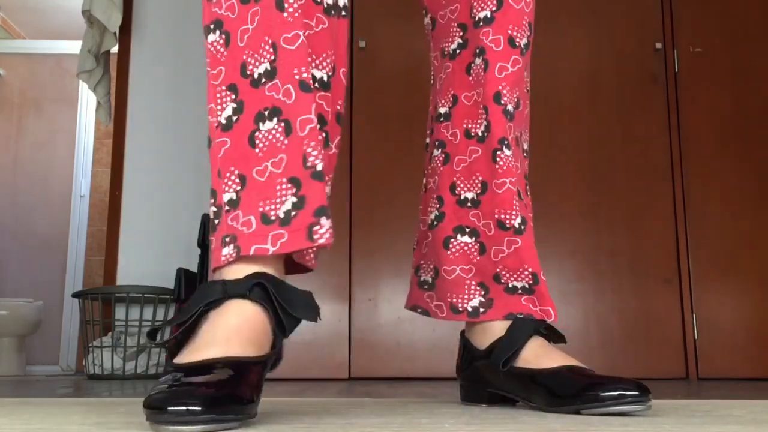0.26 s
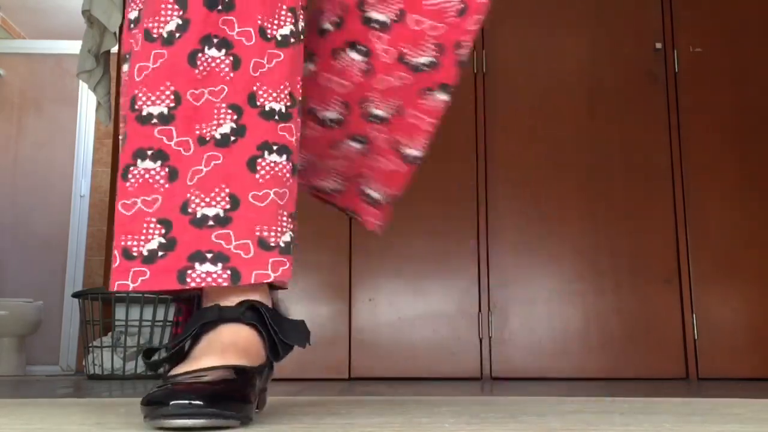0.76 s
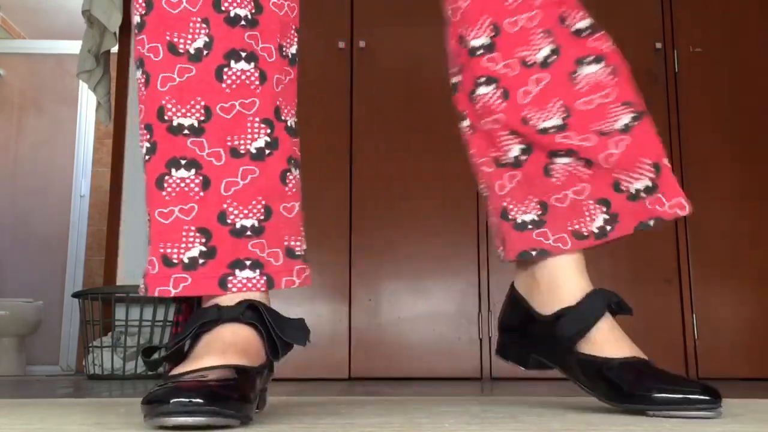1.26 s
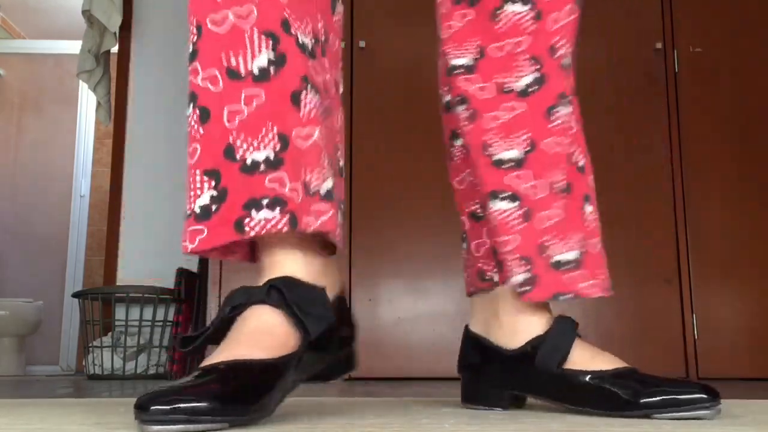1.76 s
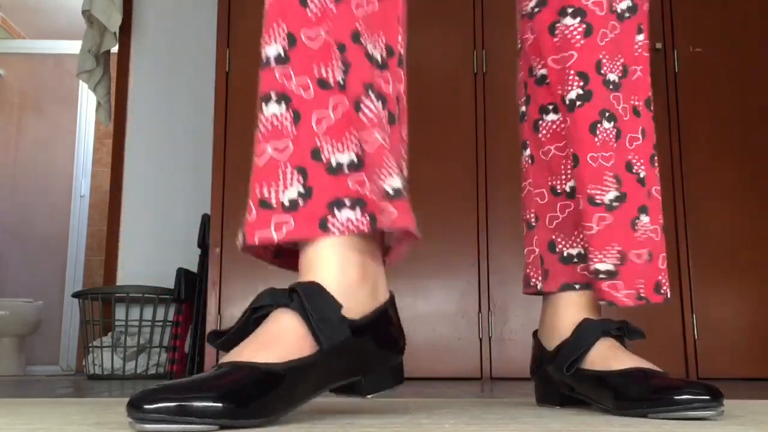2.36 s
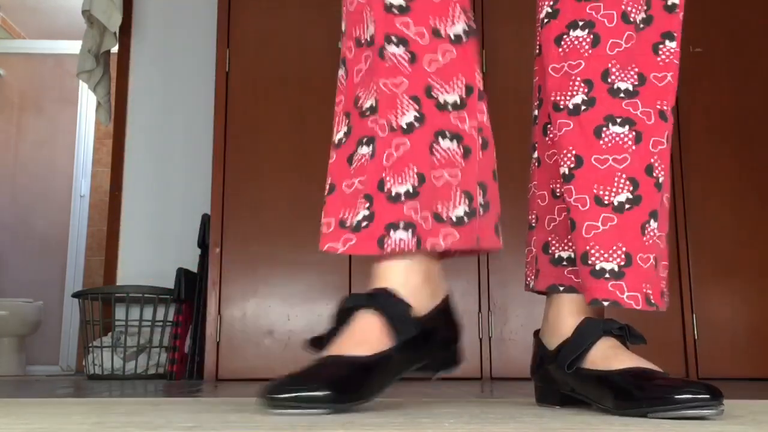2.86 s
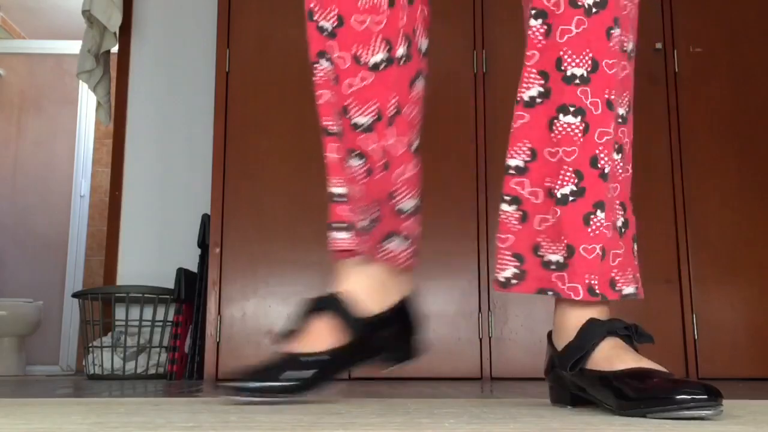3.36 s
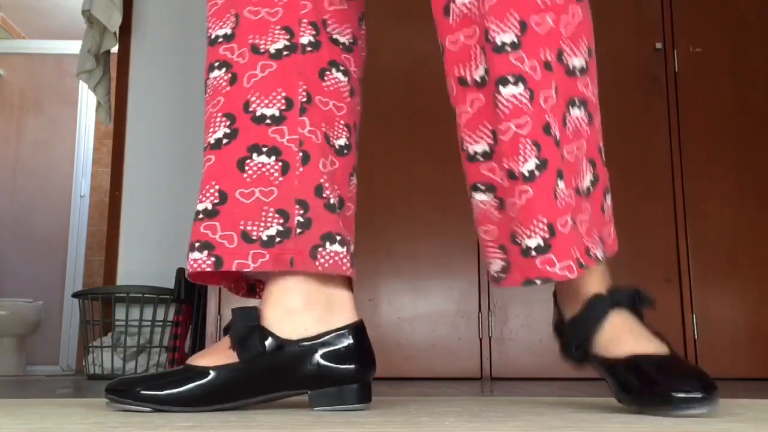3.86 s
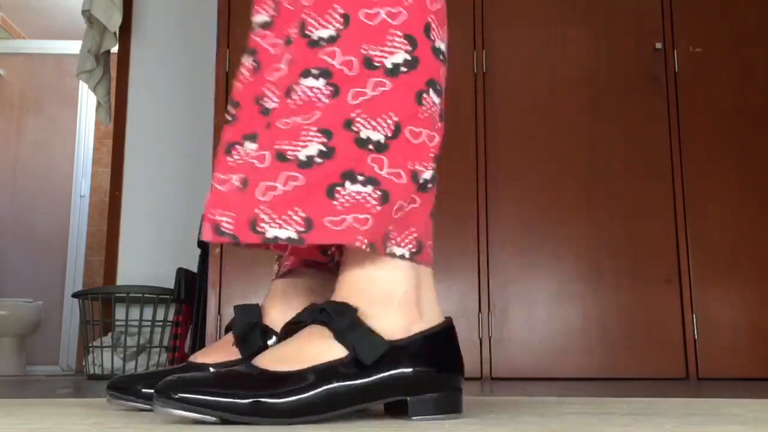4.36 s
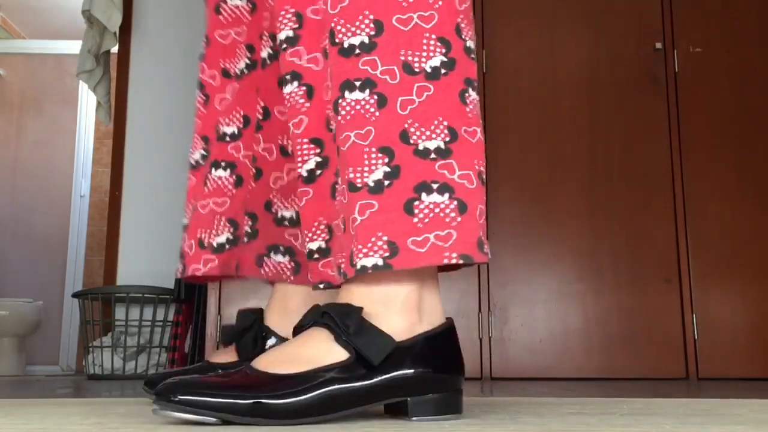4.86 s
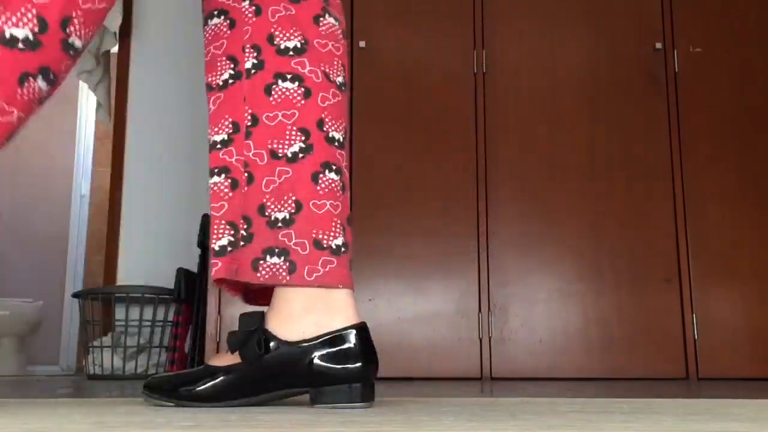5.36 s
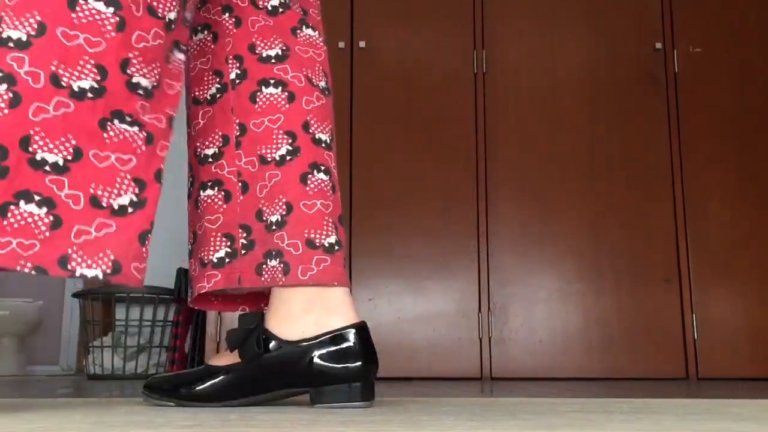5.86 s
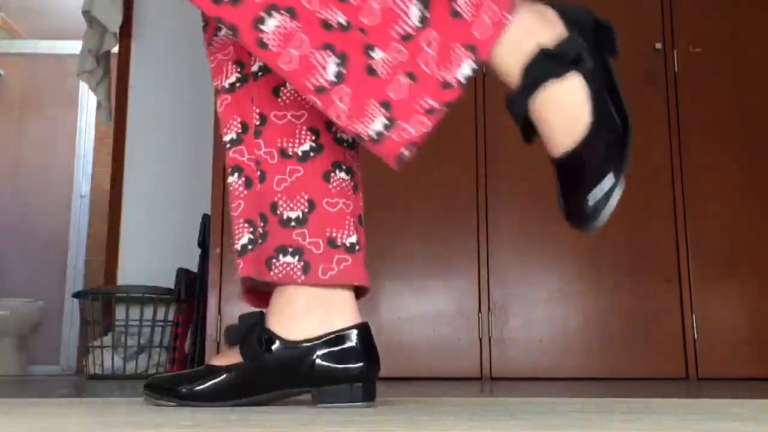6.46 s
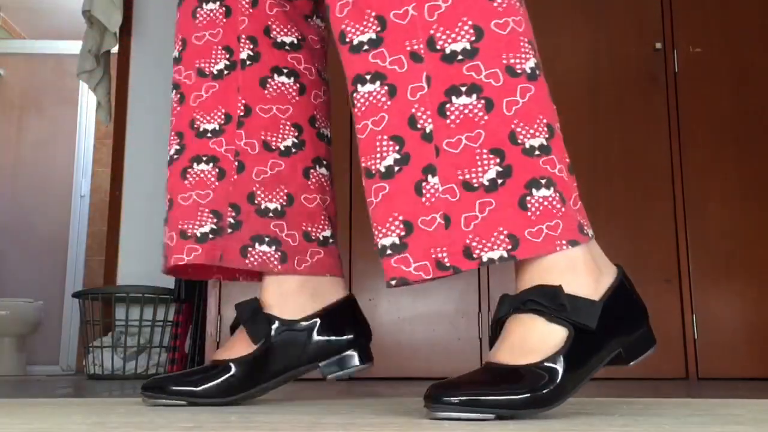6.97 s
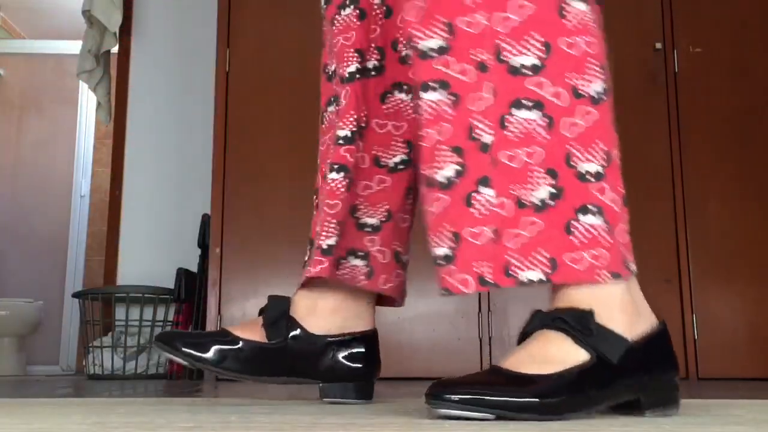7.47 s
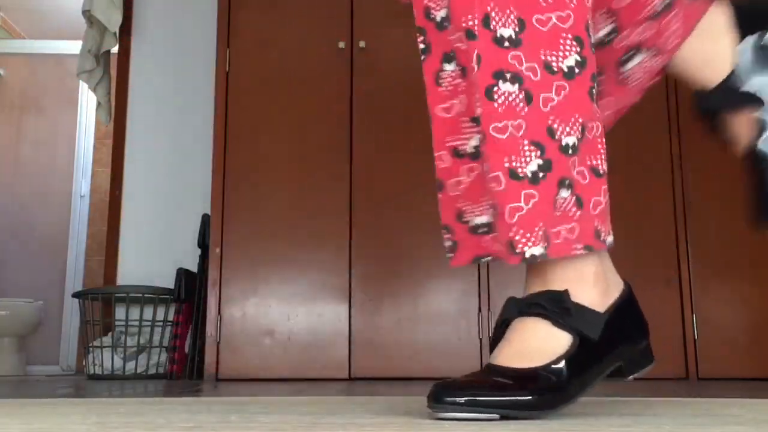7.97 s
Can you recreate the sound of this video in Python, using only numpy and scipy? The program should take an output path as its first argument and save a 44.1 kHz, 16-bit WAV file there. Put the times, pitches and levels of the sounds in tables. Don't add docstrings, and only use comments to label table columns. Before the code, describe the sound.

Close, crisp tap-dance steps clack and thud on a hard floor, each blow answered by a dense short echo in an empty-sounding room.

```python
import sys
import numpy as np
from scipy import signal
from scipy.fft import rfft, irfft, next_fast_len
from scipy.io import wavfile
from scipy.ndimage import uniform_filter1d

SR = 44100
rng = np.random.default_rng(int(sys.argv[2]) if len(sys.argv) > 2 else 0)


def field_ratio(decibels):
    return 10 ** (np.asarray(decibels, dtype=float) / 20)


def unload_wav(signal):
    wavfile.write(
        sys.argv[1],
        SR,
        np.round(np.clip(np.atleast_2d(signal).T, -1, 1) * 32767).astype(np.int16),
    )


N = 362502
LEAD = SR // 4

# start_s, peak_db, knock_hz, clack_db, click_db
BLOWS = [(0.116, -7, 1017, -9.5, -16), (0.5699, -6.5, 1136, -14.5, -32), (1.142, -18, 767, -15, -15.5),
         (1.3802, -16.5, 833, -3, -5), (1.8548, -13.5, 933, -15.5, -40), (2.0513, -14.5, 1170, -7.5, -24),
         (2.3998, -5.5, 1065, -12.5, -23), (2.5896, -13.5, 806, -14, -31.5),
         (2.9872, -17.5, 1010, -1, -18.5), (3.2879, -10.5, 1350, -11, -19), (3.7127, -15.5, 1310, -5, -12),
         (3.889, -17, 916, -14, -27), (4.4674, -5.5, 946, -22, -41), (4.992, -17.5, 928, -4.5, -9),
         (5.2218, -28.5, 720, -20, -60), (5.5989, -7, 1494, -14, -32.5), (6.1064, -4.5, 843, -3.5, -13),
         (6.4852, -10.5, 1050, -11, -17.5), (6.786, -6, 800, -7.5, -23.5), (7.2375, -8.5, 1426, -5, -23.5),
         (7.6328, -11, 904, -9, -25), (7.8095, -8, 840, -8, -10.5)]
# force_db, body_weight_db, sole_hollow_db, steel_share_db, plate_ring_db
STANCES = [(-3, -7, 0.5, 3.5, 4), (-5, 5, -3.5, -4, 3), (-8, -3, -3, 0, 7), (-6, 0, 2, 6.5, 2),
           (-9.5, -1.5, -2, -15.5, -1), (-13, -2.5, -1, -2, 2.5), (-4, 5, 4, -0.5, 2.5),
           (-13, 1, -4.5, -2, -4), (-13, -1, 4.5, 5, 1.5), (-7, 4, -0.5, -3, -12), (-8, 1.5, 2, 6.5, -5.5),
           (-19, -2.5, -3, -0.5, 1), (-4, 1, 8, -0.5, 6), (-5.5, -1, 1, 7.5, 4), (-24.5, -7, 1.5, -5, -6),
           (-5.5, 3, -7.5, -8, 5), (-0.5, -0.5, -6, 3.5, 2), (-9.5, 3.5, 1, 3.5, -1), (-2.5, 1.5, 9, 7, -2),
           (-7, 3.5, -2, 0, 0.5), (-5, 1.5, -8, -10.5, 2), (-2.5, -9, 1.5, 5, 8)]
# start_s, peak_db, thud_db, clack_db, click_db
LATE_LANDINGS = [(1.867, -31, -20, -25, -32), (3.291, -11, -30, -11, -28.5),
                 (3.7268, -36.5, -25, 14, -11.5), (4.4755, -24.5, -14.5, 4.5, -8),
                 (4.4805, -22.5, -1.5, -5.5, -3), (5.0063, -20, -2.5, -3, -27),
                 (5.617, -32, -20.5, 1.5, -7.5), (6.4839, -23, -4.5, -1, -6),
                 (6.7895, -18.5, -21, 3.5, -9.5), (6.8018, -11.5, -32, -8.5, -22.5),
                 (7.244, -23, -27, -2, -22), (7.638, -38, -17, -3.5, -6), (7.8176, -16.5, -29, -24, -10)]
# echo_db, peak_db, knock_hz, thud_db, clack_db, click_db
EARLIER_BLOW = (-30, -18, 1397, -15, -9.5, -22)
# pitch_hz, level_db, t60_s
PLATE_MODES = [(2903, 2.5, 0.0026), (3660, -1, 0.0042), (5100, -11, 0.0098), (5640, -21, 0.0034),
               (7600, -30, 0.00094), (9020, -34, 0.0018), (12100, -32, .002)]
# start_s, length_s, level_db, centre_hz
SCUFF_STROKES = [(0.535, 0.0098, -47.5, 684), (1.777, 0.01, -58.5, 920), (1.828, 0.017, -63, 885),
                 (2.018, 0.006, -59, 3200), (2.362, 0.027, -57, 750), (2.87, 0.039, -71, 3580),
                 (2.886, 0.011, -53.5, 1350), (3.687, 0.027, -66, 900), (4.421, 0.0099, -69.5, 1200),
                 (4.957, 0.025, -64.5, 895), (5.564, 0.03, -76.5, 900), (5.852, 0.017, -63, 1120),
                 (5.992, 0.03, -49, 1355), (6.03, 0.043, -51.5, 1034), (6.075, 0.019, -67, 2540),
                 (7.2, 0.033, -65.5, 1190), (7.606, 0.066, -61, 1200)]
# pitch_hz, t60_s
ROOM_DECAY = [(60, .7), (160, 0.55), (400, 0.56), (700, 0.61), (1100, 0.62), (2000, 0.64), (3800, 0.64),
              (6200, 0.5), (8500, 0.32), (14000, .3)]
# pitch_hz, level_db
ROOM_COLOUR = [(60, -19.5), (160, -6.5), (400, -11.5), (700, -6.5), (1100, -7), (2000, -9), (3200, -10),
               (4500, -10), (6200, -10.5), (8500, -10), (14000, -11.5)]
# start_s, boom_db
WEIGHT_LANDINGS = [(-.05, -52), (.11, -46), (.6, -46.5), (1.141, -67), (1.38, -40.5), (1.85, -54),
                   (2.04, -49), (2.399, -46), (2.58, -50), (2.95, -50), (3.1, -44.5), (3.27, -45),
                   (3.7, -62.5), (4.25, -68), (4.46, -35.5), (4.99, -36), (5.22, -58), (5.582, -33.5),
                   (6.091, -50), (6.47, -60), (6.77, -47), (7.23, -36.5), (7.45, -60), (7.63, -45.5),
                   (8.06, -68)]
# centre_hz, half_width_hz, level_db
SLAB_MODES = [(40, 14, -10), (68.6, 12, -2.5), (96.4, 4.9, 0)]
# pitch_hz, density_db (per Hz)
HUSH_COLOUR = [(65, -32), (110, -1), (283, 3.5), (334, -2.5), (370, -2), (606, -6.5), (1150, -7.5),
               (2950, -14.5), (4550, -16), (5590, -16.5), (6070, -18), (14600, -26.5), (15700, -34.5)]
# dip_hz, width_hz, depth_db
PORT_DIPS = [(4990, 900, -6), (7470, 900, -2.5), (10500, 1100, -4.5)]


def unit(x):
    return x / np.sqrt(np.mean(x ** 2) + 1e-20)


def along(hz, value, at):
    return np.interp(np.log(at + 1), np.log(np.asarray(hz) + 1), value)


def ring(t, hz, t60, attack):
    return -np.sin(2 * np.pi * hz * t) * field_ratio(-60 * t / t60) * (1 - np.exp(-t / attack)) ** 2


def add(track, s, sound):
    part = track[LEAD + round(s * SR):][:len(sound)]
    part += sound[:len(part)]


def tap(db, knock_hz, thud_db, clack_db, click_db):
    t = np.arange(SR // 16) / SR
    chance = rng.standard_normal(16)
    knock = ring(t, knock_hz, 0.0079, 0.00029)
    knock += field_ratio(-2.0 + 2 * chance[1]) * ring(t, 571, 0.0067, 0.00064)
    clack = ring(t, 2050 * field_ratio(0.58 * chance[0]), 0.0037, 0.00046)
    clack += field_ratio(-4.5) * ring(t, 2672, 0.0026, 0.00026)
    thud = ring(t, 285 * field_ratio(chance[2] / 2), 0.033, 0.00067)
    thud += field_ratio(-4.5) * ring(t, 187, 0.033, 0.0027)
    click = np.zeros(len(t))
    for (hz, level_db, t60), c in zip(PLATE_MODES, chance[3:]):
        click += field_ratio(level_db + 0.5 * c) * ring(t, hz * field_ratio(c / 2), t60, 0.0001)
    steel = field_ratio(clack_db + 13.5) * clack + field_ratio(click_db + 5.0) * click
    return field_ratio(db + 8.5) * (knock + field_ratio(thud_db - 2.5) * thud + steel)


def blows():
    track = np.zeros(N + LEAD)
    add(track, -0.09, answer(tap(*EARLIER_BLOW[1:]), EARLIER_BLOW[0]))
    for blow, stance in zip(BLOWS, STANCES):
        s, peak_db, knock_hz, clack_db, click_db = blow
        force_db, weight_db, hollow_db, steel_db, ring_db = stance
        thud_db = -25.5 + 1.8 * weight_db - peak_db
        add(track, s, tap(peak_db, knock_hz, thud_db, clack_db, click_db))
        boom_db = -8 + 0.74 * weight_db - force_db
        edge_db = -14.5 + 0.85 * steel_db
        sheen_db = -33 + 1.4 * steel_db + ring_db
        whole_shoe = tap(0, knock_hz, -15, -8, -20)
        add(track, s, answer(whole_shoe, force_db - 21.5, boom_db, hollow_db, edge_db, sheen_db))
    return track[LEAD:]


def bounces():
    track = np.zeros(N + LEAD)
    for s, db, *parts_db in LATE_LANDINGS:
        blow_hz = [row[2] for row in BLOWS if row[0] < s + 0.004][-1]
        sound = tap(db, 0.64 * blow_hz, *parts_db)
        add(track, s, sound)
        add(track, s, answer(sound, db - 19))
    return track[LEAD:]


def scuffs():
    track = np.zeros(N + LEAD)
    size = SR // 8
    t = np.arange(SR // 40) / SR
    for s, length, db, centre_hz in SCUFF_STROKES:
        grit = rng.standard_normal(size) * field_ratio(2 * rng.standard_normal(size))
        stroke = np.sin(np.pi * np.clip(np.arange(size) / SR / length, 0, 1)) ** 0.91
        shoe = ring(t, centre_hz, 0.0042, 0.0003) + field_ratio(-11.5) * ring(t, 260, 0.0074, 0.00033)
        drag = unit(signal.fftconvolve(grit, shoe)[:size])
        add(track, s, field_ratio(db + 6.0) * stroke * drag)
        add(track, s + length / 2, answer(shoe, db - 8))
    return track[LEAD:]


def answer(sound, db, boom_db=0, body_db=0, edge_db=-10, sheen_db=-24):
    noise = rng.standard_normal(SR * 3 // 4)
    hz, t, z = signal.stft(noise, SR, nperseg=512, noverlap=384)
    fine = np.fft.rfftfreq(2048, 1 / SR)
    blur = np.exp(-0.5 * (np.log((fine + 60) / (hz[:, None] + 60)) / 0.14) ** 2)
    colour = np.sqrt(blur @ np.abs(rfft(sound, 2048)) ** 2 / blur.sum(axis=1))
    colour *= field_ratio(along(*np.transpose(ROOM_COLOUR), hz))
    tilt_hz = [200, 440, 630, 900, 3000, 4800, 6000, 12000]
    tilt_db = [boom_db, 0.13 * body_db, body_db, 0,
               edge_db + 8.0, edge_db + 9, sheen_db + 24.5, sheen_db + 25]
    colour *= field_ratio(along(tilt_hz, tilt_db, hz))
    colour *= field_ratio(1.8 * unit(uniform_filter1d(rng.standard_normal(len(hz)), size=2)))
    fade = field_ratio(-60 * t / along(*np.transpose(ROOM_DECAY), hz)[:, None])
    tail = signal.istft(z * colour[:, None] * fade, SR, nperseg=512, noverlap=384)[1]
    age = np.arange(len(tail)) / SR
    slaps = sum(0.45 * np.exp(-((age - s) / 0.001) ** 2) for s in rng.uniform(0.01, 0.045, size=5))
    build = 1 - np.exp(-(age / 0.0055) ** 1.5)
    tail *= build * (1 + slaps)
    return field_ratio(db) * tail / np.sqrt(np.mean(tail[SR // 50:SR // 10] ** 2))


def suppressed(x, knee_db, depth):
    hz, t, z = signal.stft(x, SR, nperseg=512)
    power = uniform_filter1d(np.abs(z) ** 2, size=5, axis=0)
    power = np.abs(uniform_filter1d(power, size=7, axis=1))
    expected_db = along([100, 1000, 4000, 12000], [3, 0, -11, -19], hz)
    knee = field_ratio(2 * (knee_db + expected_db))[:, None]
    gain = (power / (power + knee) + 1e-9) ** depth
    return signal.istft(z * gain, SR, nperseg=512)[1][:N]


def drone():
    m = next_fast_len(N)
    hz = np.fft.rfftfreq(m, 1 / SR)
    slab = np.zeros(len(hz))
    for centre_hz, half_width_hz, db in SLAB_MODES:
        slab += field_ratio(db) / (1 + ((hz - centre_hz) / half_width_hz) ** 2)
    traffic_db, slab_t60, sink_s = -69, 0.55, 0.01
    load = np.full(N + LEAD, field_ratio(traffic_db))
    t = np.arange(SR) / SR
    for s, db in WEIGHT_LANDINGS:
        add(load, s, field_ratio(db + 1 - 60 * t / slab_t60) * (1 - np.exp(-(t / sink_s) ** 2)))
    rumble = unit(irfft(rfft(rng.standard_normal(m)) * slab, m)[:N])
    return load[LEAD:] * rumble


def hush():
    hz, t, z = signal.stft(rng.standard_normal(N + SR), SR, nperseg=4096)
    patches_db = unit(uniform_filter1d(rng.standard_normal(z.shape), size=20, axis=0))
    colour_db = along(*np.transpose(HUSH_COLOUR), hz)[:, None]
    hiss = signal.istft(z * field_ratio(colour_db + patches_db), SR, nperseg=4096)[1][:N]
    return field_ratio(-66) * unit(hiss)


def scene():
    dancer = blows() + bounces() + scuffs()
    return (suppressed(dancer, knee_db=-73.5, depth=1.3) + drone() + hush())[None]


def roll_off(x):
    return signal.sosfilt(signal.butter(12, 15720, fs=SR, output="sos"), x)


def record(dry):
    m = next_fast_len(N + SR)
    hz = np.fft.rfftfreq(m, 1 / SR)
    response = (1j * hz / (1j * hz + 45)) ** 2 * (hz < 15720)
    for dip_hz, width_hz, db in PORT_DIPS:
        detune = dip_hz ** 2 - hz ** 2
        damping = 1j * hz * width_hz
        response *= (detune + damping * field_ratio(db)) / (detune + damping)
    heard = irfft(rfft(dry, m) * response, m)[:, :N]
    bent = heard / (1 + np.abs(heard / 0.95) ** 4) ** (1 / 4)
    return roll_off(bent)


dry = scene()
out = record(dry)
unload_wav(out)
```